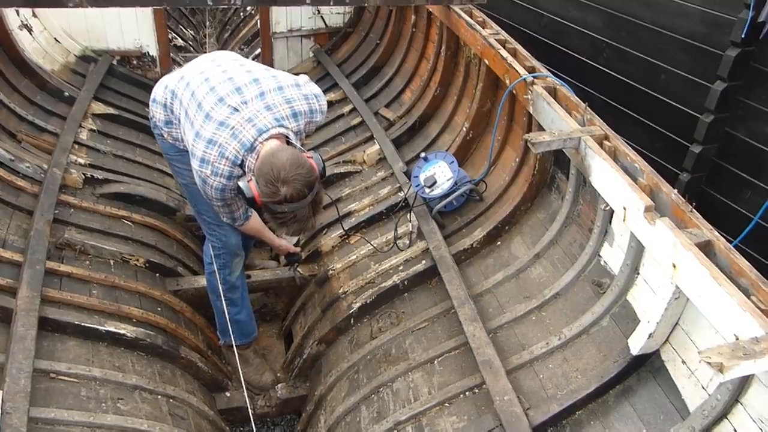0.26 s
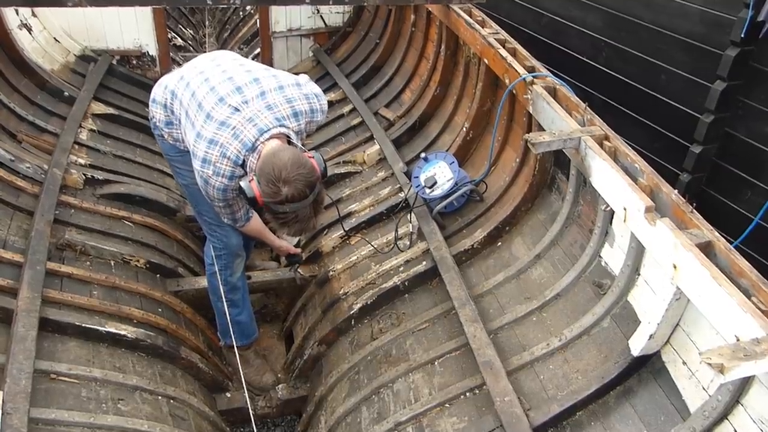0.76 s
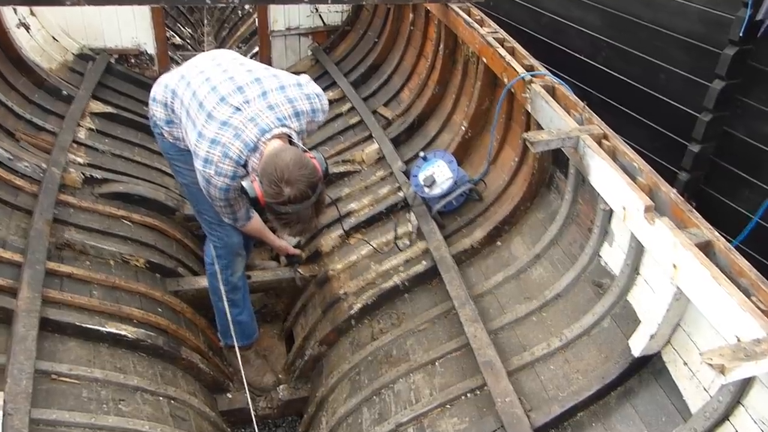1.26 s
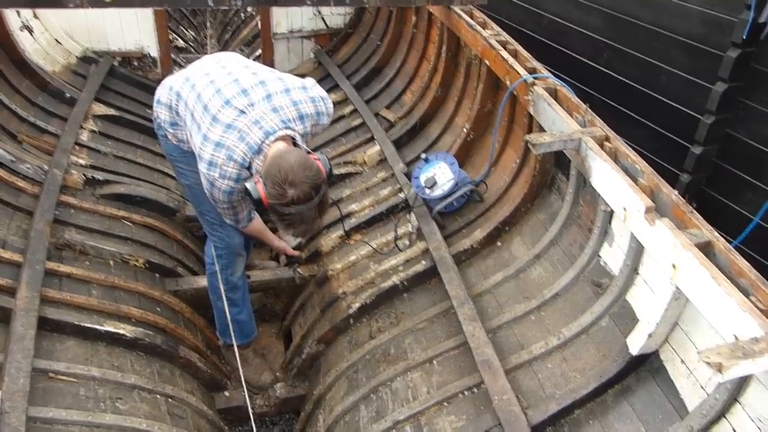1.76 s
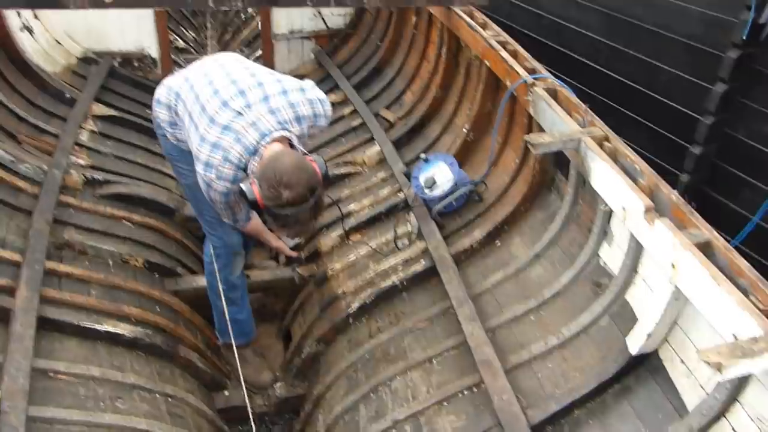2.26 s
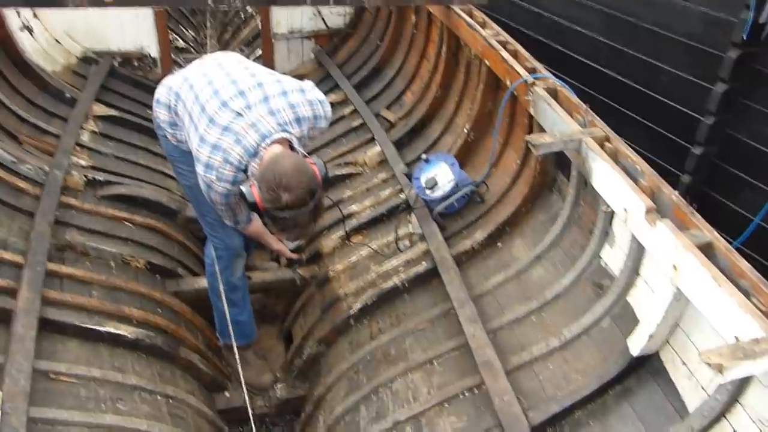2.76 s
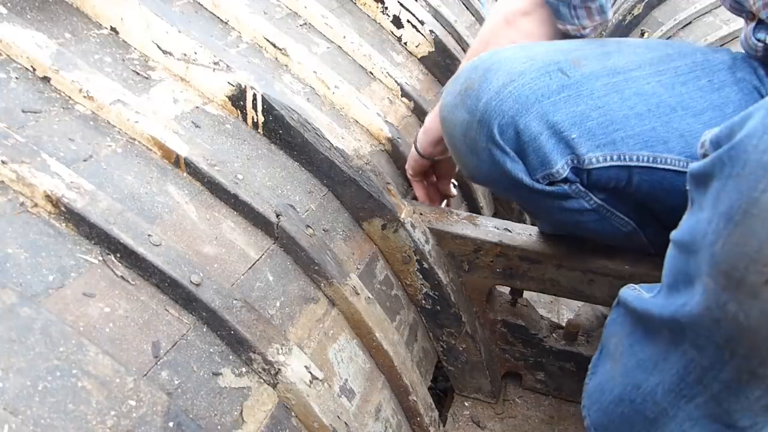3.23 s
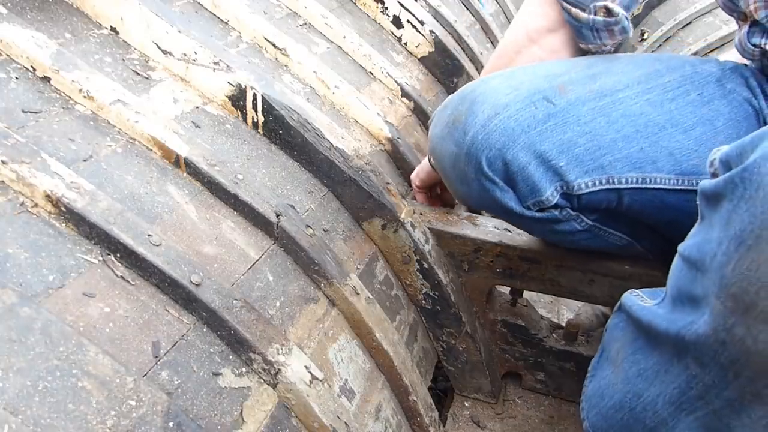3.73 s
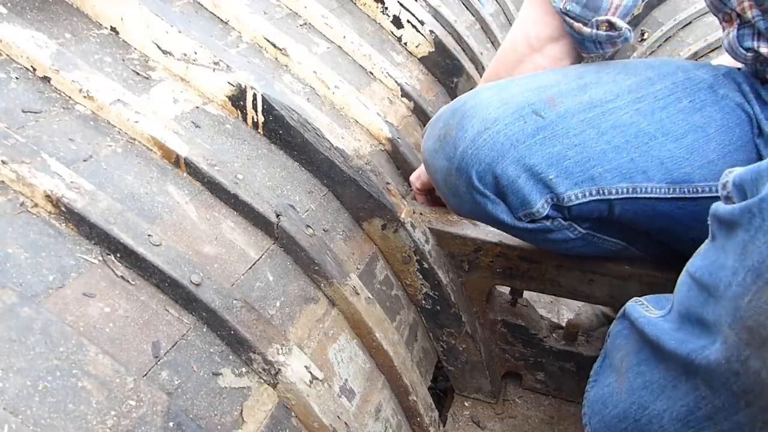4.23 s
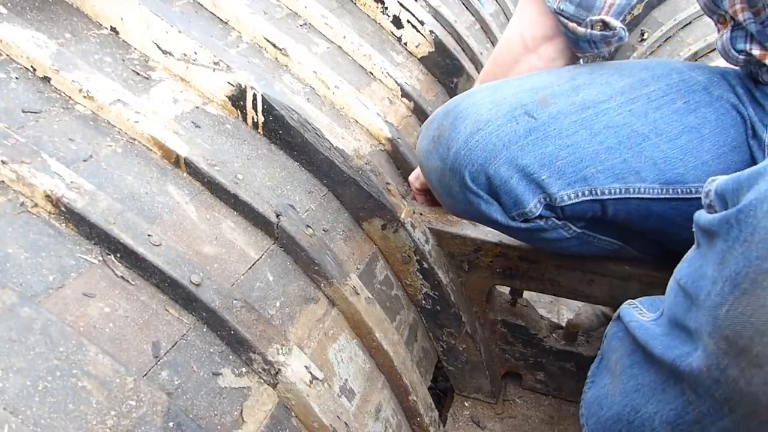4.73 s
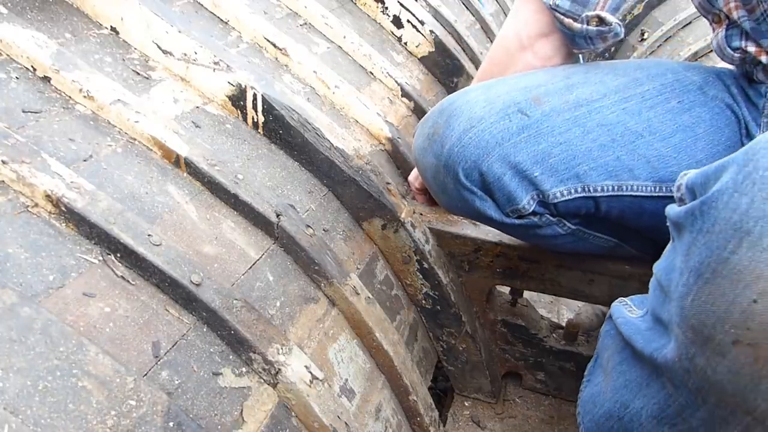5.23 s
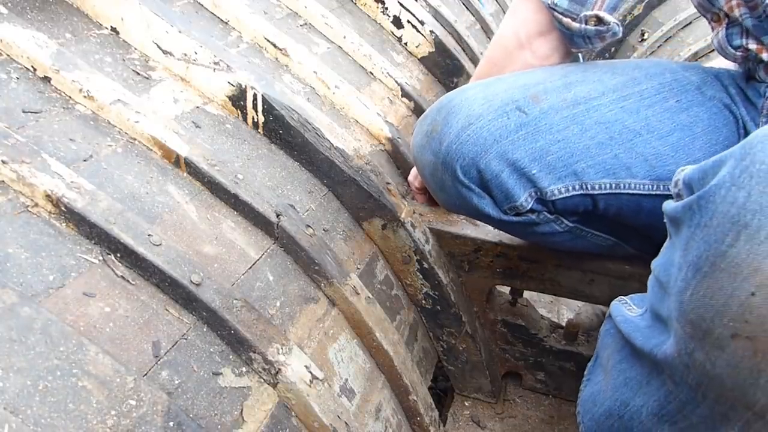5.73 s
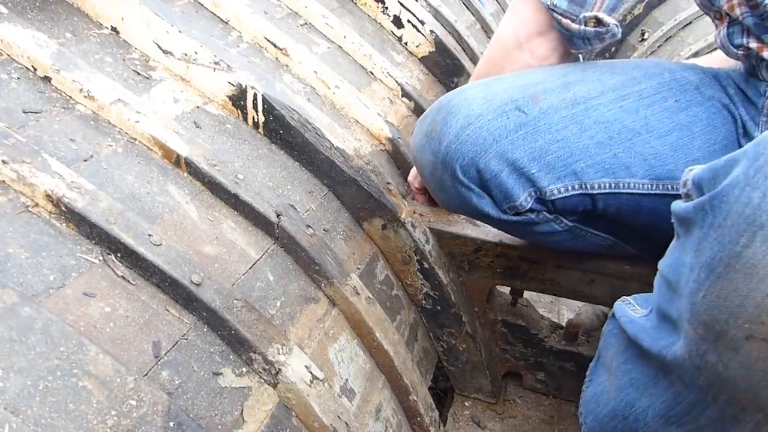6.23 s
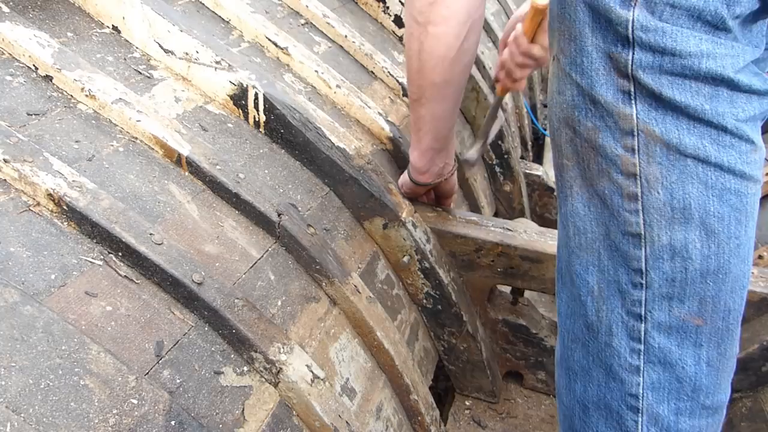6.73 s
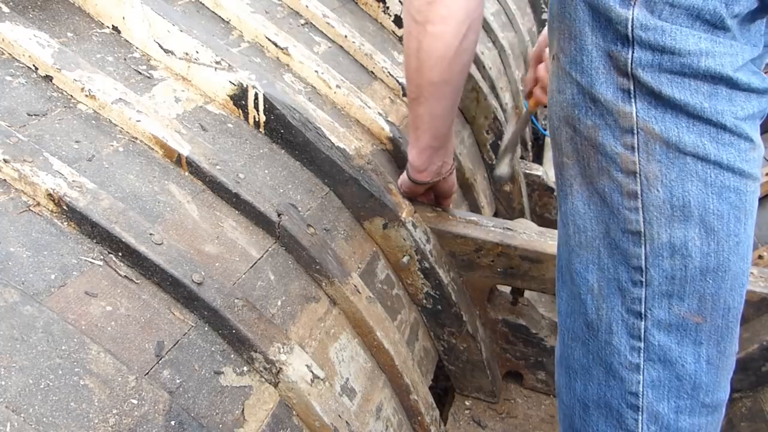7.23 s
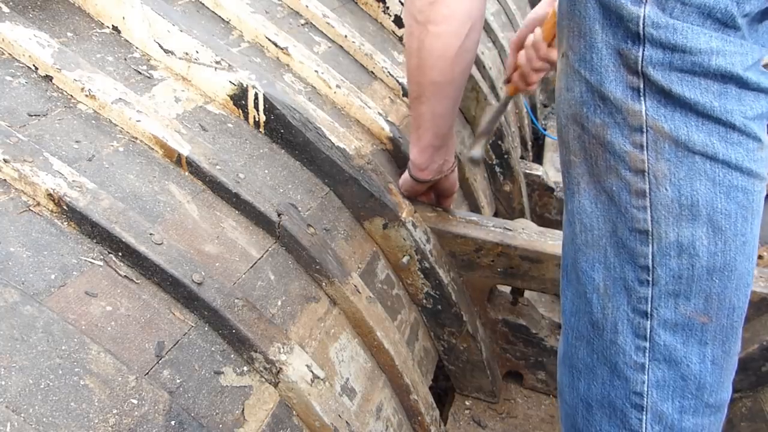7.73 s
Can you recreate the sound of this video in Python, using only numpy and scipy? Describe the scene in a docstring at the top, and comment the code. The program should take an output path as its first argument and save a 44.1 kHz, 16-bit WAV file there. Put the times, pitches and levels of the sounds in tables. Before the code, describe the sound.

A geared motor buzzes and screams for three seconds, straining lower as it bites, then cuts off. After a short silence, tools bump and drag on wood with a small metallic clink. Loud, regular hammer blows follow, each a steel crack with a woody knock and short hollow rattle. A tiny dropout, then two brighter blows. Close microphone, outdoors, quiet air and a faint low hum.

```python
"""A geared power tool whines inside an open wooden hull; after a short silence a tool is set down
hard, then a hammer drives a steel punch through the frames, among light knocks over quiet yard air.
Three passages are split by two silences. Tool: sines and noise tied to one motor speed.
Strikes and knocks: decaying modes and noise. Yard: coloured noise and a low hum."""
import sys
import numpy as np
from scipy import signal
from scipy.io import wavfile
from scipy.ndimage import uniform_filter1d

SR = 44100
rng = np.random.default_rng(int(sys.argv[2]) if len(sys.argv) > 2 else 0)


def output_pcm(signal):
    """Save a mono or channel-first signal as 16-bit PCM at the path in sys.argv[1].

    Samples are clipped to [-1, 1] before scaling.
    """
    pcm = np.clip(np.atleast_2d(signal).T, -1, 1) * 32767
    wavfile.write(sys.argv[1], SR, np.round(pcm).astype(np.int16))


N = 352359

# the tool set down hard (first row), then hammer blows: (time [s], level [dB], knock [dB],
# knock pitch [Hz], crack [dB], treble [dB], bass [dB], centre of the steel shimmer [Hz], shimmer [dB])
STRIKES = [(4.018, -5, -19, 800, -10, 9, 9.5, 9100, 10), (4.5297, -0.8, -4, 1300, 3, -2.5, 1.3, 6430, 4),
           (4.9537, 2, 2.5, 800, -2.5, -4, -4, 9650, 4), (5.3783, 0, 3, 750, 0.5, -1, -2.5, 8800, 7.5),
           (5.8086, 0, 6, 800, 4, -0.7, -1.5, 8570, 8), (6.2217, 0, 4, 780, -0.3, -1, -1.5, 11660, 9.5),
           (6.6603, -0.15, 4, 800, 0, -1, -0.5, 11660, 9.5),
           (7.2294, -0.1, -.3, 700, 3, 4, -3.5, 8220, 3.5), (7.7077, -0.9, -1.8, 720, 8, 3, -1, 8050, 4)]
# audible passages: (start [s], fade begins [s], fade length [s])
PASSAGES = [(0, 2.977, .034), (3.1625, 6.775, .035), (6.941, 9, 1)]


def gain_of(db):
    """Decibels to an amplitude factor."""
    return 10 ** (np.asarray(db) / 20)


def evened(x):
    """Scales to rms 1."""
    return x / np.sqrt(np.mean(x ** 2) + 1e-20)


def read(points, hz):
    """Reads a (Hz, value) table along log frequency."""
    f, value = np.transpose(points)
    return np.interp(np.log(hz + 1), np.log(f + 1), value)


def add(mix, s, sound):
    """Adds a two-channel sound at time s, cut at the end of the mix."""
    part = mix[:, round(s * SR):][:, :sound.shape[1]]
    part += sound[:, :part.shape[1]]


def wander(count, size, length=N):
    """Rows of slow random drift, linear between knots size samples apart."""
    knots = rng.standard_normal((count, length // size + 2))
    at = np.arange(length) / size
    return np.array([np.interp(at, np.arange(len(k)), k) for k in knots])


def noise(colour_db, count, same, patchy_db, size):
    """Two-channel noise of correlation same; colour_db(Hz, s) sets each short-time spectrum cell."""
    frames = 4 * count // size + 5
    hz = np.fft.rfftfreq(size, 1 / SR)[:, None]
    frame_s = np.arange(frames) * size / 4 / SR
    a, b, c, d, patches = rng.standard_normal((frames, size // 2 + 1, 5)).T
    patches = uniform_filter1d(patches, size=size // 64, axis=0)
    patches = evened(uniform_filter1d(patches, size=8, axis=1))
    mid = a + 1j * b
    side = (c + 1j * d) * np.sqrt((1 - same) / (1 + same))
    cells = gain_of(colour_db(hz, frame_s) + patchy_db * patches)
    spectrum = np.array([mid + side, mid - side]) * cells
    return signal.istft(spectrum, nperseg=size, noverlap=3 * size // 4)[1][:, :count]


def tool():
    """Whine, shaft tones and roar share one motor, which runs up and then sags under load."""
    # pressure on the work: (time [s], pressure [1 = full])
    pressure = [(1.085, 0), (1.414, .311), (1.896, .542), (2.251, .993), (2.405, 1.066), (3.05, 1.031)]
    # armature tones: (turns multiple, rounded in use, relative level light [dB], loaded [dB])
    armature_tones = [(5, -52, -60), (6, -64.5, -64), (6.93, -59.5, -61), (8.03, -61.5, -67),
                      (10, -56.5, -63), (10.95, -64, -72), (11.98, -58.5, -60.5), (13, -62, -61),
                      (14, -57.5, -60.5), (16.1, -62.5, -69), (17.2, -67, -74), (20, -75, -76),
                      (21.3, -64, -77), (24, -58, -63), (27, -73, -66)]
    # spindle tones: (turns multiple, rounded in use, relative level light [dB], loaded [dB])
    spindle_tones = [(3, -82, -81), (3.83, -82, -78), (5.07, -75, -72), (6.06, -85.5, -78),
                     (7.05, -87.5, -79), (8.16, -82, -80), (8.98, -78.5, -76), (9.96, -85, -70.5),
                     (10.9, -74, -72.5), (13, -71, -82), (14, -69.5, -79.5), (15, -68.5, -74),
                     (16.81, -67, -72.5), (17.65, -77.5, -71), (18.9, -68, -64.5), (21, -65, -60),
                     (22.04, -72.5, -56.5), (25, -84, -70), (28, -85, -74), (29.06, -69, -61),
                     (43, -60.5, -64), (44.7, -71.5, -63.5), (50, -62.5, -61), (51.3, -56.5, -59.5),
                     (53.3, -70, -59), (54, -75, -59)]
    # whine paths round the hull; they add and cancel as the pitch moves:
    # (delay [ms], lengthening as the tool shifts [ms per s], relative level [dB])
    paths = [(0, 0, 0), (12.2963, -.1294, 9.9), (14.7841, -.0115, 7.3), (20.4868, .2169, -3.5),
             (21.4166, .0582, 1.05)]
    # air and brush roar, before a fixed lift: (time [s], level [dB])
    roar_level = [(0.0, -41.5), (0.08, -42.5), (2.02, -42), (2.08, -44.5), (2.97, -43.5)]
    # roar colour: (frequency [Hz], relative level [dB per Hz])
    roar_colour = [(35, -49), (60, -50), (193, -19), (256, -39), (448, -16.5), (503, -24), (715, -6.5),
                   (1060, -6), (2090, 9.5), (2300, 0.5), (3670, -5.5), (4860, -4), (9350, -2.5),
                   (13900, -14.5), (16000, -31)]
    # housing resonances: (frequency [Hz], width [Hz], lift [dB])
    casing = [(1940, 730, -8.5), (4970, 400, 4), (7100, 660, -0.5), (8800, 530, -0.5)]
    bars, pinion_teeth, crown_teeth = 23, 5, 51  # commutator bars, reduction gear
    free_hz, short_hz, sag_hz = 9788, 1080, 450  # whine: free, shortfall at 0 s, sag at full load
    run_up_s, run_up_db = .274, -9  # e-fold time; armature tones fainter at 0 s
    whine_db, load_bite = -52.5, 2  # tones change with load to this power

    lead = SR // 20  # computed before 0 s, then cut
    t = np.arange(-lead, round(3.05 * SR)) / SR
    load = np.interp(t, *np.transpose(pressure))
    short = np.exp(-t / run_up_s)
    jitter, flutter = wander(count=2, size=700, length=len(t))
    whine_hz = (free_hz - short_hz * short - sag_hz * load) * (1 + .0003 * jitter)
    turns = np.cumsum(whine_hz) / bars / SR
    spindle = turns * pinion_teeth / crown_teeth
    spindle_swing = np.cos(2 * np.pi * spindle)  # the spindle runs slightly out of true

    whine = 0
    for ms, drift, db in paths:
        delayed_turns = np.interp(t - (ms + drift * t) / 1000, t, turns)
        whine = whine + gain_of(db) * np.sin(2 * np.pi * bars * delayed_turns)
    whine = whine * gain_of(whine_db + 2.7 * flutter)

    bite = load ** load_bite
    grit = wander(count=1, size=250, length=len(t))[0]
    armature = locked(armature_tones, turns, bite, 3.1, size=1500)
    armature *= gain_of(run_up_db * short + 3 * grit)
    tones = (1 + 0.11 * spindle_swing) * (whine + armature)
    tones += locked(spindle_tones, spindle, bite, 3.0, size=5000)

    def colour(hz, s):
        bumps = sum(db / (1 + (2 * (hz - f) / w) ** 2) for f, w, db in casing)
        return read(roar_colour, hz) + bumps

    roar = evened(noise(colour, len(t), 1.0, 1.32, size=1024))
    roar *= gain_of(np.interp(t, *np.transpose(roar_level)) + 1.5)
    roar *= 1 + 0.032 * spindle_swing
    return (np.sqrt(2) * tones + roar)[:, lead:]


def locked(table, turns, load, flutter_db, size, step=25):
    """Sines on whole multiples of a shaft, each fluttering alone; a sharp resonance lifts those near it."""
    resonance_hz, half_width_hz, lift_db = 4600, 45, 13
    shaft_hz = np.gradient(turns)[::step] * SR  # levels are set in steps of step samples
    load = load[::step]
    out = np.zeros(len(turns))
    drifts = wander(len(table), size // step, len(load))
    for (k, light, heavy), drift in zip(table, drifts):
        multiple = round(k)
        db = light + (heavy - light) * load + flutter_db * drift
        db += lift_db / (1 + ((multiple * shaft_hz - resonance_hz) / half_width_hz) ** 2)
        level = np.repeat(gain_of(db), step)[:len(turns)]
        out += level * np.sin(2 * np.pi * multiple * turns + k * k)
    return out


def strike(ring, db, knock_db, knock_hz, crack_db, treble_db, bass_db, shimmer_hz, shimmer_db):
    """Steel crack, a hard short knock, the hull modes and the rattle of the planks."""
    # steel on steel: (frequency [Hz], relative level [dB per Hz])
    crack_colour = [(500, -24.5), (2000, -21.5), (5000, -4.5), (9000, -12), (12500, -12.5), (16000, -13)]
    t = np.arange(round(.45 * SR)) / SR
    middle_db = 1.3 - .4 * knock_db  # a weaker knock leaves more middle in the rattle
    knock_shape = .8 * np.exp(-((t - .0016) / .0015) ** 2)
    knock = knock_shape * np.sin(2 * np.pi * knock_hz * t)
    steel = noise(lambda hz, s: read(crack_colour, hz) + 0 * s, len(t), 0.91, 0, size=256)
    crack = gain_of(crack_db - 60 * t / 0.012) * evened(steel)
    planks = rattle(treble_db, middle_db, bass_db, ring, 0.65, shimmer_hz, shimmer_db)
    planks = planks * (1 + 3.8 * np.exp(-t / 0.0031))
    wood = gain_of(-22.5) * hull(t, bass_db, ring) + gain_of(knock_db) * knock
    onset = 1 - np.exp(-t / 0.00044)
    return gain_of(db) * onset * (gain_of(-18.0) * planks + wood + gain_of(-9.0) * crack)


def hull(t, bass_db, ring):
    """The same wood modes answer every touch, slightly varied, then the whole frame late and low."""
    # hull modes: (frequency [Hz], relative level [dB], base t60 [s])
    modes = [(209, -2.5, 0.18), (349, 0.5, 0.21), (455, -2.5, 0.2), (523.3, -6, .14), (554, -5, 0.18),
             (648, -5, 0.15), (696, -0.5, 0.16), (825, -6.5, 0.13), (900, -0.5, 0.098), (965, -9.5, 0.11),
             (1220, -7.5, .08), (1264, -4.5, 0.044), (1430, -12, .1)]
    thud_hz, thud_after_s, thud_width_s, thud_db = 348, .0105, .002, 7.3
    out = 0
    chance = rng.standard_normal((len(modes), 2))
    for k, ((hz, db, t60), (level_chance, pitch_chance)) in enumerate(zip(modes, chance)):
        t60 = ring * np.minimum(t60, np.sqrt(11 / hz))  # higher modes cannot ring long in wood
        db = db + 2.0 * level_chance + read([(300, bass_db), (800, 0.0029)], hz)
        phase = 2 * np.pi * hz * (1 + 0.0027 * pitch_chance) * t + k * k
        out = out + gain_of(db - 60 * t / t60) * np.sin(phase)
    late = t - thud_after_s
    thud = gain_of(thud_db + bass_db - 4.3 * (late / thud_width_s) ** 2)
    thud = thud * np.cos(2 * np.pi * thud_hz * late)
    return out * (1 - np.exp(-t / 0.0022)) + thud


def rattle(treble_db, middle_db, bass_db, ring, same, shimmer_hz=9000, shimmer_db=0):
    """Short modes of planks and steel as noise, each band dying at its own speed, shimmer slower."""
    # rattle colour: (frequency [Hz], relative level [dB per Hz])
    body = [(24, -64.5), (40, -33.5), (194, -11), (283, -5.5), (354, 1.5), (570, 1), (790, 1),
            (1040, -13.5), (1240, -3.5), (1950, -13), (2500, -16), (3300, -18.5), (8990, -16),
            (14800, -32.5), (16000, -56.5)]
    # decay, before scaling: (frequency [Hz], t60 [s])
    decay = [(100, 1), (260, 0.17), (700, 0.19), (1840, 0.17), (4850, 0.21), (12800, 0.17)]
    tilt = [(200, bass_db), (800, 0.0013), (2500, middle_db), (6000, treble_db)]

    def colour(hz, s):
        shimmer = shimmer_db / (1 + ((hz - shimmer_hz) / 1200) ** 2)
        t60 = ring * read(decay, hz) * (1 + 0.036 * shimmer)
        return read(body, hz) + read(tilt, hz) + shimmer - 60 * s / t60

    x = noise(colour, round(.45 * SR), same, 2.5, size=256)
    return x / np.sqrt(np.mean(x[:, :400] ** 2))  # the first 400 samples set the level


def bump(db, treble_db, middle_db, rise_s):
    """A light touch sets the rattle and the hull going, without a crack; a slow rise is a scrape."""
    t = np.arange(round(.45 * SR)) / SR
    bass_db = -4.5 - 13.5 * np.tanh((middle_db - 1.8) / 2)  # dull touches are bassy, hard ones thin
    ring = 1.224 + 0.011 * db  # soft touches die sooner
    wood = rattle(treble_db, middle_db, bass_db, ring, 0.64) + gain_of(-15) * hull(t, bass_db, ring)
    onset = 1 - np.exp(-t / max(rise_s, 1e-4))
    return gain_of(db) * onset * (1 + 1.3 * np.exp(-t / 0.0024)) * wood


def punch(hz, db, t60):
    """One mode of the steel rod, softly started."""
    t = np.arange(round(t60 * SR)) / SR
    level = gain_of(db - 60 * t / t60) * (1 - np.exp(-t / 0.0021))
    return np.tile(level * np.sin(2 * np.pi * hz * t), (2, 1))


def yard():
    """Wide, slightly patchy outdoor air and a low hum, heard with brief level dips after strikes."""
    # levels outside the dips: (time [s], air [dB], air treble [dB], hum [dB])
    levels = [(3.16, -44.5, 3.5, -69), (4.3, -45, -0.2, -68), (4.65, -42, 8, -59), (4.9, -49, -2.7, -48.5),
              (6.78, -58.5, -1, -55), (6.94, -63.5, -0.5, -61), (7.4, -62.5, -2.5, -65.5),
              (7.99, -63, -3, -68)]
    # air colour: (frequency [Hz], relative level [dB per Hz])
    air_colour = [(15, -58), (25, -38.5), (48, -31.5), (120, -16.5), (200, -11.5), (427, -14.5),
                  (516, -11.5), (1190, -12), (2840, -23), (9570, -27.5), (14000, -41.5), (16000, -68)]
    hum_hz = 177  # centre of a slight drift
    hold_s, return_s, air_dip_db, hum_dip_db = .2, .03, -4, -13  # full depths
    t = np.arange(N) / SR
    s, air_db, treble_db, hum_db = np.transpose(levels)

    dip = 0
    for strike_s, _, knock_db, *_ in STRIKES:
        depth = min(gain_of(knock_db), 1)
        dip = dip + (t > strike_s) * depth * np.clip(1 + (strike_s + hold_s - t) / return_s, 0, 1)

    def colour(hz, at):
        hiss_db = 5 / (1 + ((hz - 4800) / 200) ** 2)  # a faint narrow hiss
        treble = np.interp(at, s, treble_db) * read([(1500, 0.041), (5000, 0.98)], hz)
        return read(air_colour, hz) + hiss_db + treble

    air = evened(noise(colour, N, 0.52, 1.3, size=1024))
    drift, waver = wander(count=2, size=2500)
    hum = np.sin(2 * np.pi * np.cumsum(hum_hz + 1.0 * drift) / SR)
    air *= gain_of(np.interp(t, s, air_db) + air_dip_db * dip)
    hum *= gain_of(np.interp(t, s, hum_db) + hum_dip_db * dip + 2.6 * waver)
    return (air + hum) * (t > PASSAGES[1][0])


def scene():
    """Sums the sources; the struck sounds are high-passed, so they carry little deep bass."""
    # tools laid on, bumped or dragged along the wood:
    # (time [s], level [dB], treble [dB], middle [dB], rise [s])
    touches = [(3.163, -32.5, -15, -25, 0.0011), (3.2, -22, -14.5, 6.5, 0.00032),
               (3.373, -45.5, 0, 10, .0008), (3.381, -37.5, 9, 16, 0.00078), (3.405, -37.5, 11, 21, 0.0065),
               (3.53, -38, -21, 5, 0.0081), (3.553, -49.5, 1, 6, .0006), (3.576, -42.5, 0.5, 4, 0.00042),
               (3.62, -41.5, 2, 15, 0.0009), (3.768, -39, -1.5, 5, .0035), (4.097, -24.5, -9, -3, 0.0027),
               (4.14, -27.5, 5, 7, 0.015), (4.213, -17.5, 0.3, 7.5, 0.011), (4.352, -42, 5, 5.5, 0.0023),
               (4.465, -39.5, -5, 2.5, .008), (4.675, -38, -13.5, 3.5, 0.0058),
               (4.722, -46.5, 2.5, -2, 0.0016), (5.27, -54.5, 5.5, 1.5, 0.0023), (6.112, -58, 8, 4, 0.0011),
               (6.514, -63.5, 13, 4.5, 0.0022), (6.611, -54, 7, 4.5, .001)]
    # short steel rings of the punch: (time [s], frequency [Hz], level [dB], t60 [s])
    steel_rings = [(4.035, 6850, -39, 0.19), (4.097, 3100, -26, 0.035), (4.098, 2860, -30, 0.045),
                   (4.375, 4100, -59.5, .3)]
    struck = np.zeros((2, N))
    for k, (s, *row) in enumerate(STRIKES):
        add(struck, s, strike(0.96 + .035 * k, *row))  # each strike rings a little longer than the last
    for s, *row in touches:
        add(struck, s, bump(*row))
    for s, *row in steel_rings:
        add(struck, s, punch(*row))
    high_pass = signal.butter(4, 130, "high", fs=SR, output="sos")
    mix = yard() + signal.sosfilt(high_pass, struck)
    add(mix, 0, tool())
    return mix


def record(dry):
    """Flattens peaks towards full scale, gates the passages with short ramps, then low-passes."""
    edge_hz = 15900
    t = np.arange(N) / SR
    gate = 0
    for start_s, fade_at_s, fade_s in PASSAGES:
        opening = np.clip((t - start_s) / 0.0033 + (start_s == 0), 0, 1)  # no ramp at 0 s
        closing = np.cos(np.pi / 2 * np.clip((t - fade_at_s) / fade_s, 0, 1)) ** 2
        gate = gate + opening * closing
    held = dry / (1 + abs(dry) ** 4) ** .25
    low_pass = signal.firwin(511, edge_hz, window=("kaiser", 9), fs=SR)
    return signal.oaconvolve(held * gate, low_pass[None], "same")


dry = scene()
out = record(dry)
output_pcm(out)
```